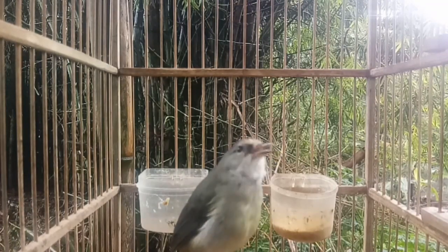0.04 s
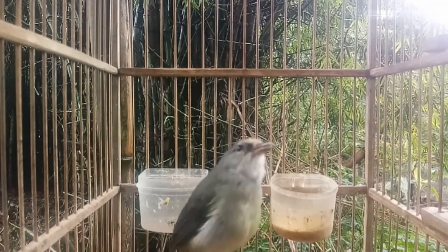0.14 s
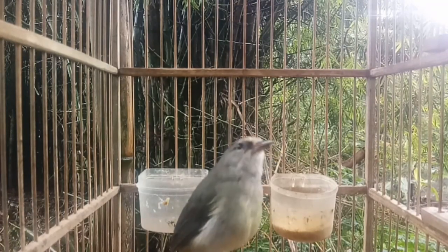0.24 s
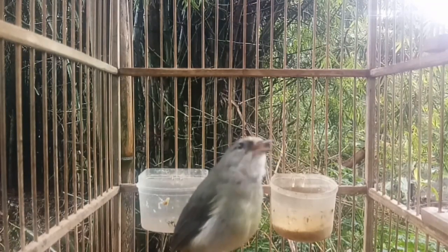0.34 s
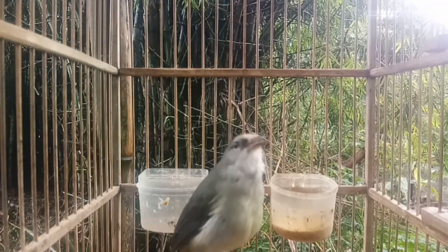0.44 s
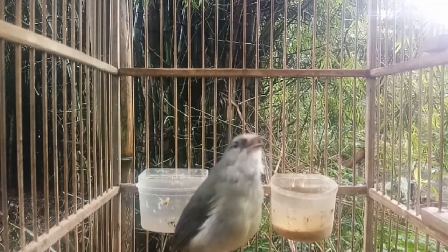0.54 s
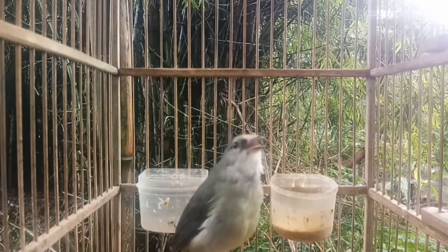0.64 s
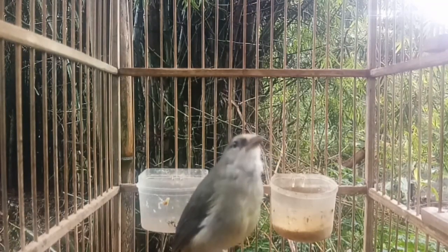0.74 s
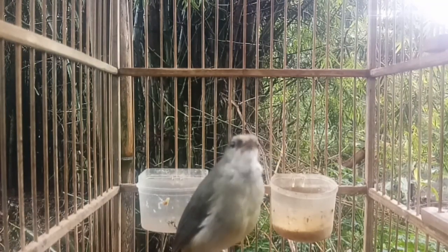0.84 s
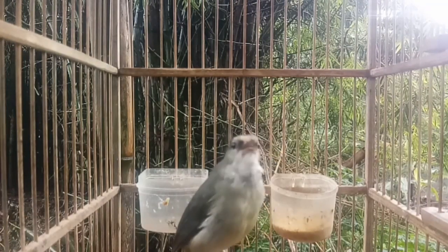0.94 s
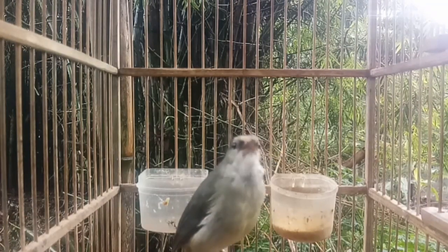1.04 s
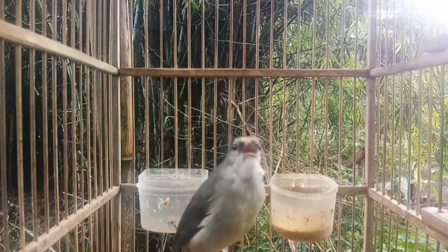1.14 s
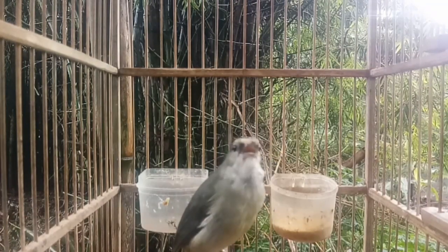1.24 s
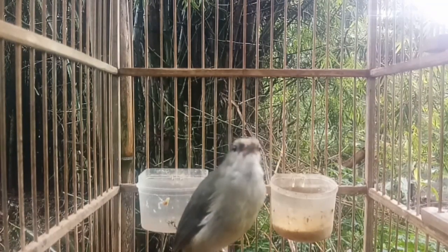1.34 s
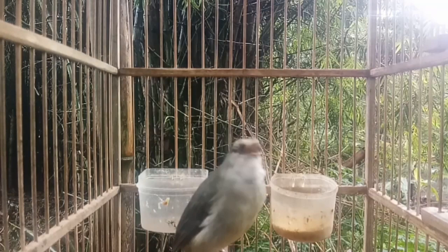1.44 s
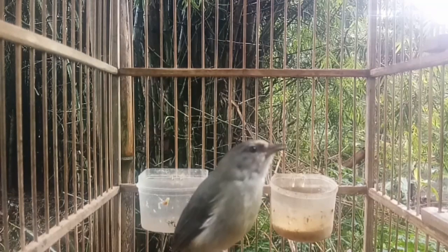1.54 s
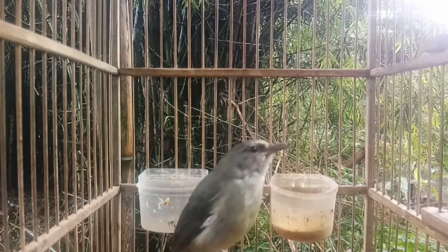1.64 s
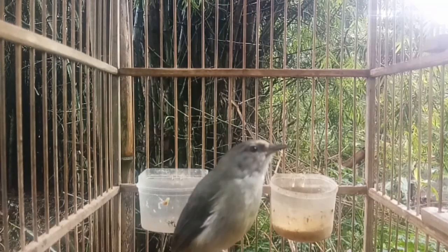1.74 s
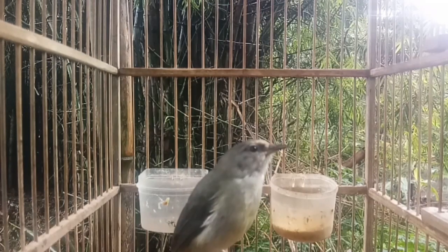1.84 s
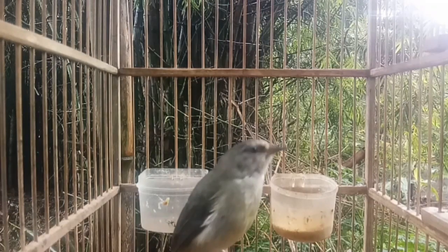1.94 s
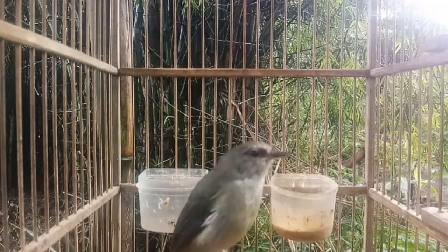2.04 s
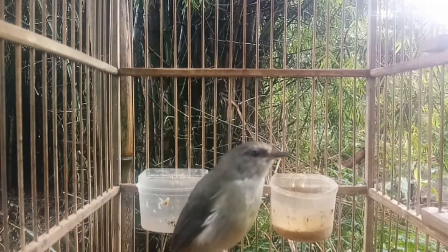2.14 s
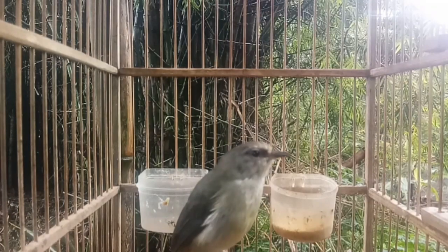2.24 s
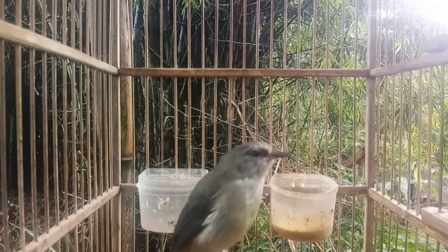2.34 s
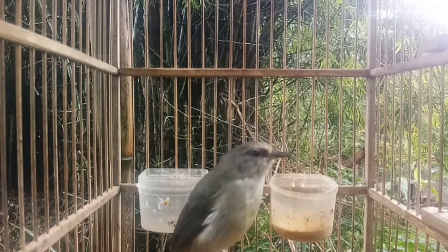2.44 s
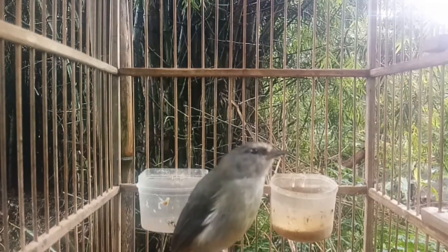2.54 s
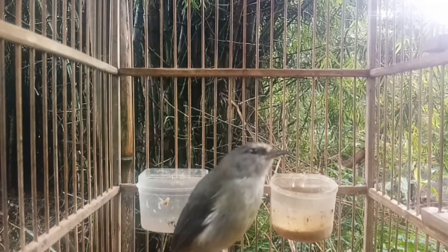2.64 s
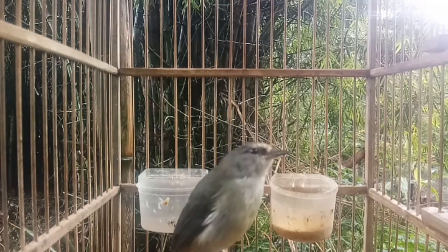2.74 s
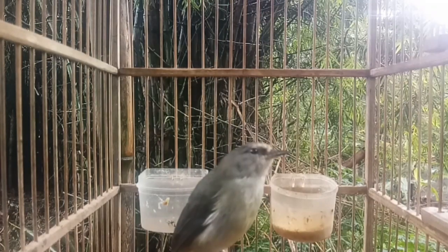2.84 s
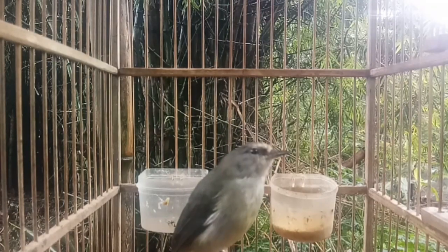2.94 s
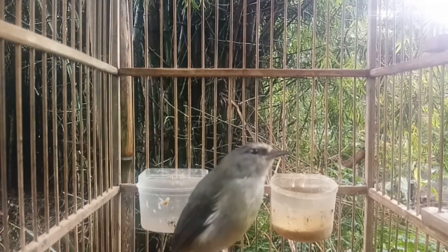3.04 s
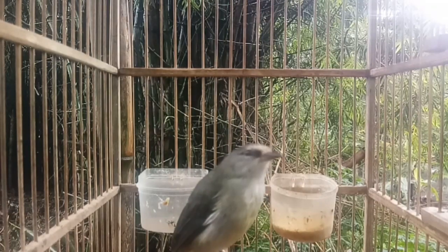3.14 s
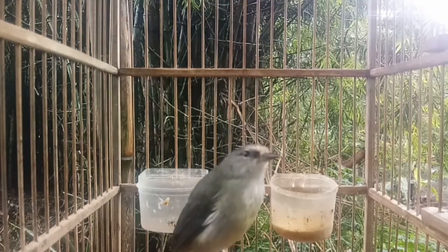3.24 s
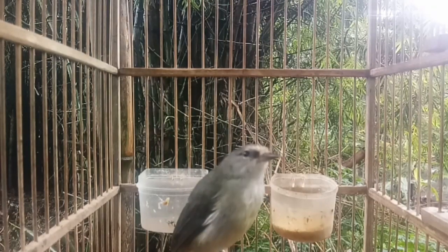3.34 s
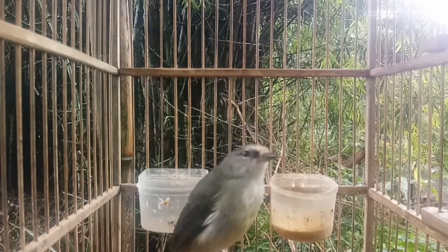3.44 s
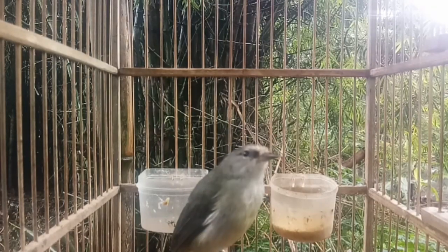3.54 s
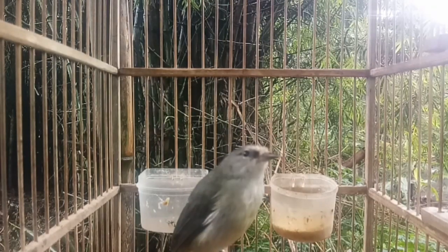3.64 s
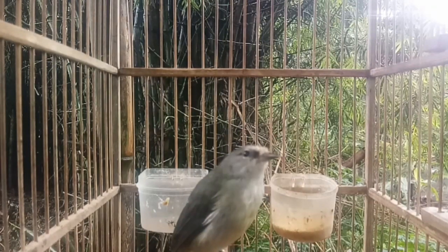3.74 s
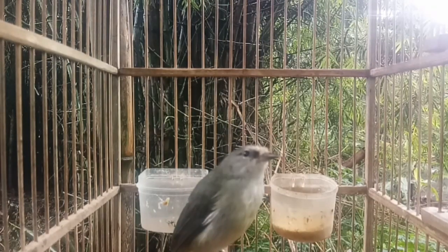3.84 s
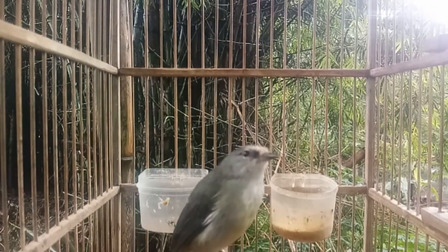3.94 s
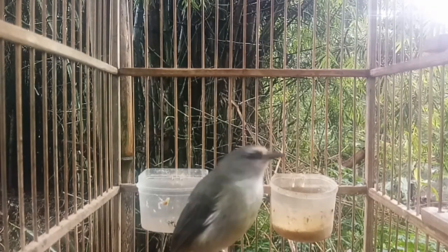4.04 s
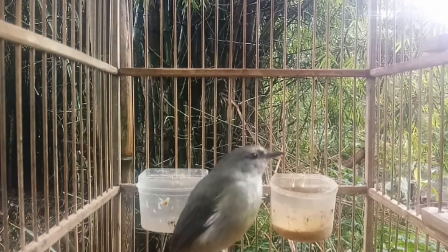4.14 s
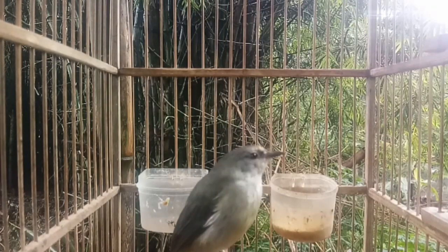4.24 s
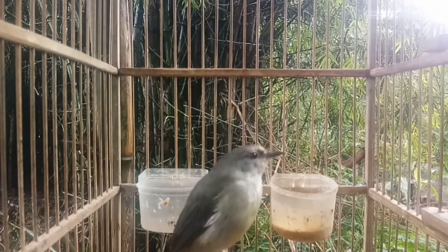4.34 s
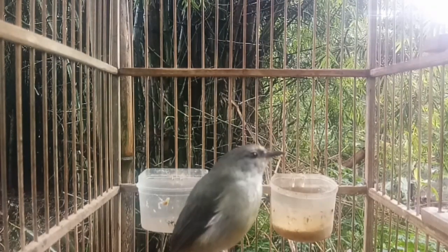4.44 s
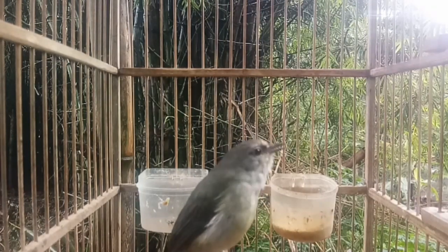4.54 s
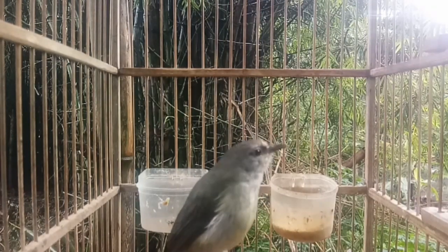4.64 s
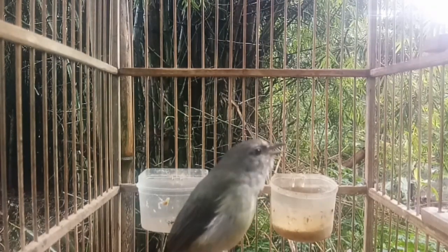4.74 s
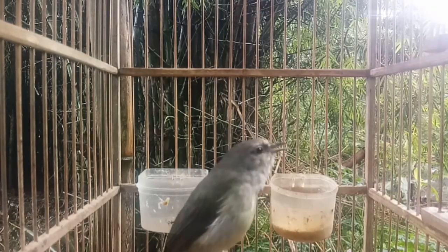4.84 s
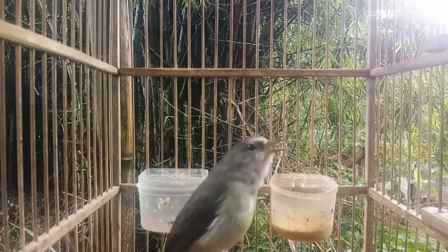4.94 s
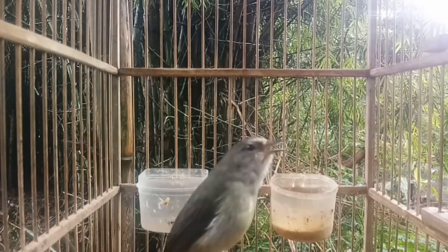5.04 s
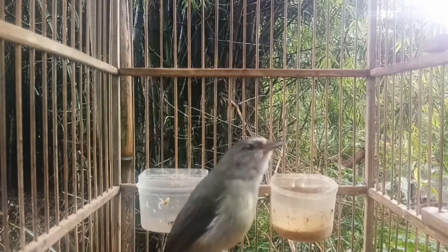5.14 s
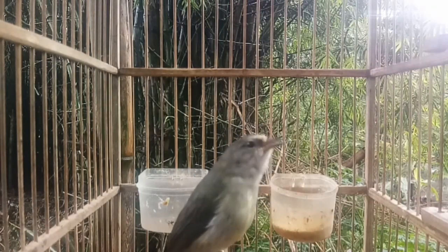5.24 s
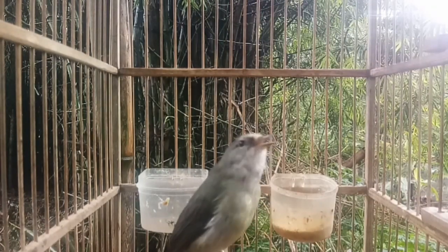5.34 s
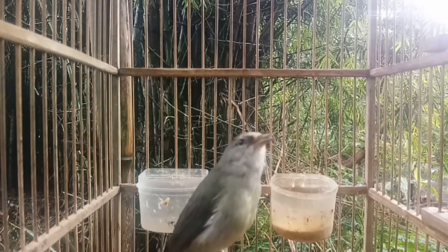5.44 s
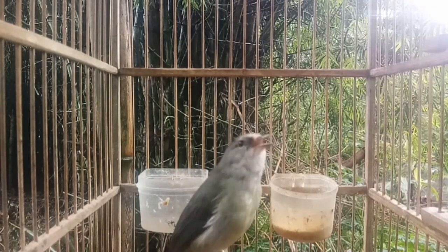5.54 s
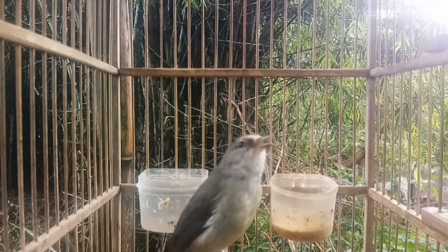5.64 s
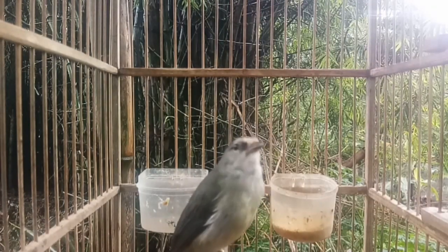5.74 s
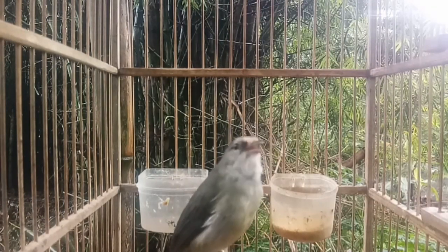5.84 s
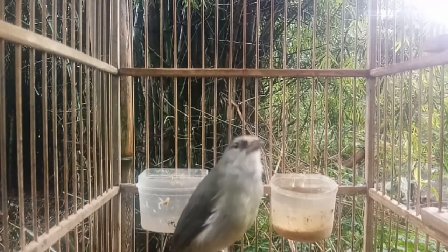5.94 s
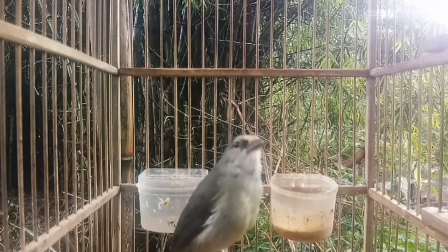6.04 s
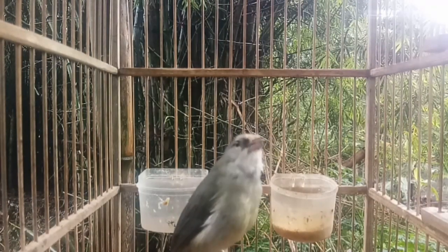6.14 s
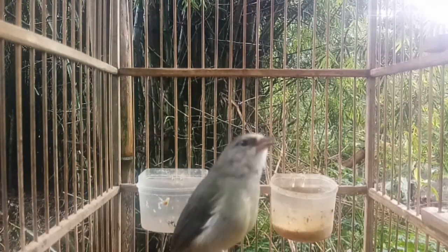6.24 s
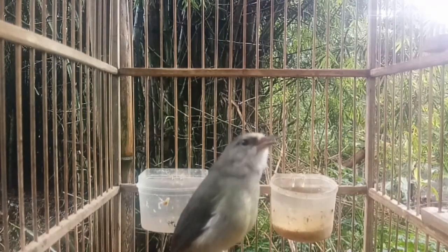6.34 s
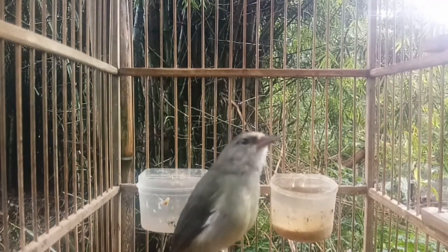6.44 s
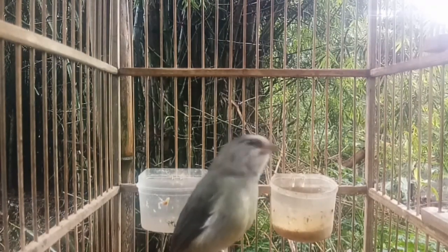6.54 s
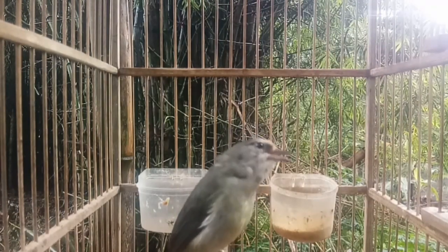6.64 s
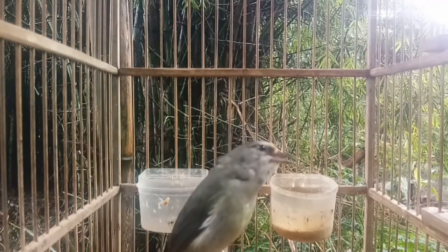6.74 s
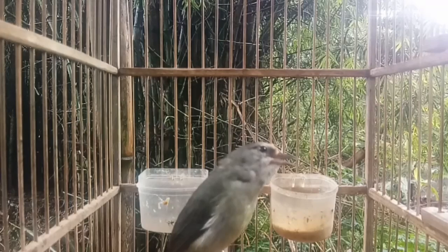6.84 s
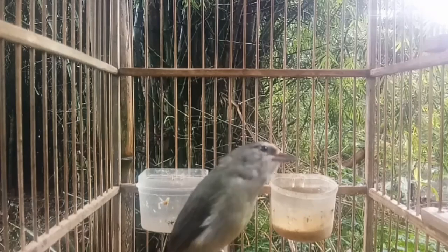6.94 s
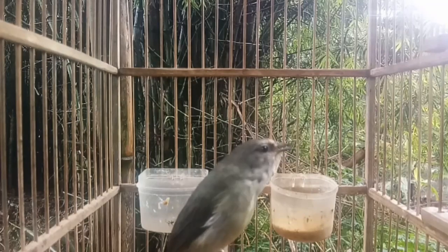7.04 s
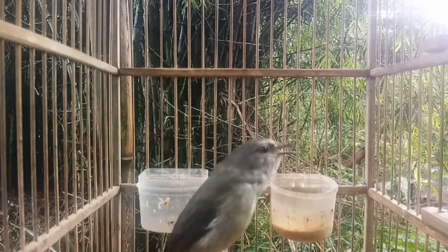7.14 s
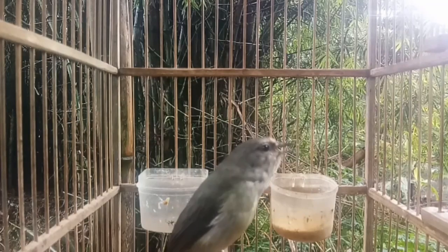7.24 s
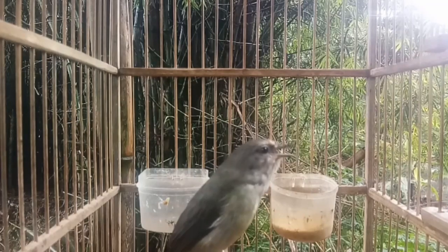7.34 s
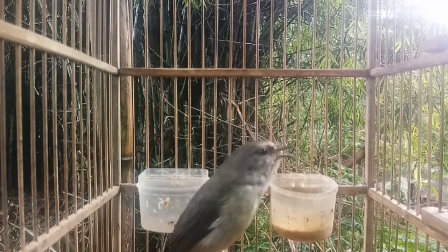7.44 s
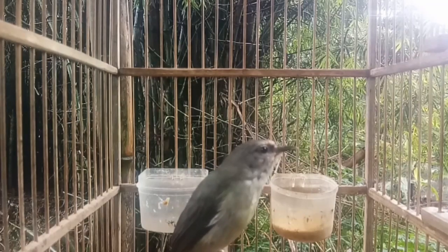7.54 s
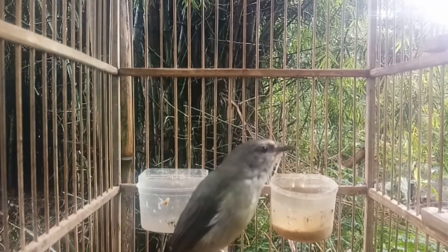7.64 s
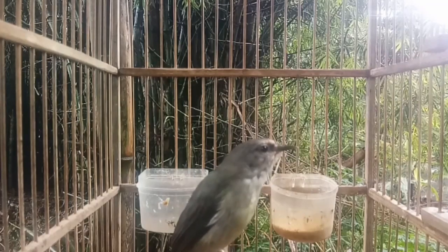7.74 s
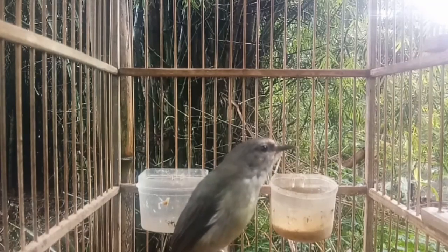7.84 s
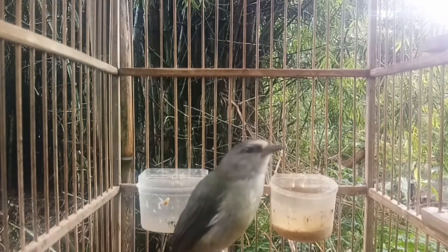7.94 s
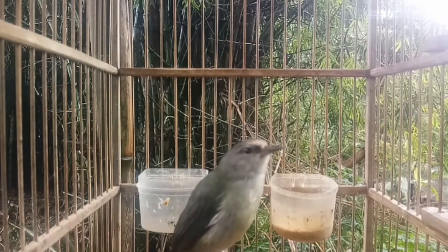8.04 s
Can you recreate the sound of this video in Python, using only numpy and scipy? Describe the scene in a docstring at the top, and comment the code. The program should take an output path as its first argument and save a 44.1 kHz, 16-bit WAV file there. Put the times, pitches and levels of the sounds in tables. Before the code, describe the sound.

Bright rapid bird whistles, jumping between low chirps and long piercing notes, pause mid-way over garden hiss, then resume and stop.

```python
"""A white-eye in a garden cage sings two bouts of quick slurred whistles, close to the microphone.
Each note is a gliding sine with faint overtones and fainter lines halfway between them.
A few far birds whistle more simply; a thin insect line, a steady outdoor hiss and a low rumble are shaped noise.
Echoes of the garden follow the birds, and the recorder's gain control pulls the hiss down under the loudest notes."""
import sys
import numpy as np
from scipy import signal
from scipy.fft import rfft, irfft, next_fast_len
from scipy.io import wavfile
from scipy.ndimage import uniform_filter1d

SR = 44100
rng = np.random.default_rng(int(sys.argv[2]) if len(sys.argv) > 2 else 0)


def output_pcm(signal):
    """Save a mono or channel-first signal as 16-bit PCM at the path in sys.argv[1].

    Samples are clipped to [-1, 1] before scaling.
    """
    pcm = np.clip(np.atleast_2d(signal).T, -1, 1) * 32767
    wavfile.write(sys.argv[1], SR, np.round(pcm).astype(np.int16))


N = 356748  # length of the scene in samples
TIME = np.arange(N) / SR


def gain_of(db):
    """Turns decibels into a factor for the wave."""
    return 10 ** (np.asarray(db) / 20)


def evened(x):
    """Scales a signal to an average strength (rms) of 1."""
    return x / np.sqrt(np.mean(x ** 2) + 1e-20)


def read(points, hz):
    """Reads a table of values by frequency, on a logarithmic frequency axis."""
    f, value = np.transpose(points)
    return np.interp(np.log(hz + 1), np.log(f + 1), value)


def band_noise(hz, width_hz):
    """Noise of rms 1 in a bell-shaped band; around 0 Hz it is a slow wander."""
    size = next_fast_len(N)
    bins_hz = np.fft.rfftfreq(size, 1 / SR)
    bell = np.exp(-.5 * ((bins_hz - hz) / width_hz) ** 2)
    return evened(irfft(rfft(rng.standard_normal(size)) * bell, size)[:N])


def slur(rows, fade_s):
    """Gives the sample places, gliding pitch and amplitude of one note with soft ends."""
    s, hz, db = np.transpose(rows)
    at = np.arange(max(int(s[0] * SR), 0), min(int(s[-1] * SR), N))
    t = at / SR
    to_nearest_end_s = np.minimum(t - s[0], s[-1] - t)
    ends = np.sin(np.pi / 2 * np.clip(to_nearest_end_s / fade_s, 0, 1))
    swell = np.interp(t, s, np.sqrt(gain_of(db))) ** 2
    pitch_hz = uniform_filter1d(np.interp(t, s, hz), size=130)
    # a sine needs a peak of sqrt(2) to have an rms of 1
    return at, pitch_hz, np.sqrt(2) * ends * uniform_filter1d(swell, size=60)


# The close bird's song, one list per note. Each row: time in seconds, pitch in Hz, level in dB.
SONG = [
    [(0.093, 2730, -28), (0.102, 2620, -19.5), (0.111, 2790, -15.5), (0.119, 2730, -15.5),
     (0.127, 2530, -27)],
    [(0.155, 2800, -29), (0.159, 2820, -18), (0.168, 2925, -12.5), (0.197, 2920, -11.5),
     (0.215, 3150, -8.5), (0.229, 3170, -11.5), (0.236, 3130, -11.5), (0.242, 3140, -29)],
    [(0.286, 2810, -36), (0.293, 2730, -13.5), (0.304, 2970, -9.5), (0.312, 2960, -8), (0.318, 3250, 0),
     (0.328, 3250, -11), (0.335, 3000, -6), (0.341, 2690, -19.5), (0.346, 2750, -36)],
    [(0.461, 2580, -29), (0.468, 2680, -19), (0.479, 3080, -9.5), (0.484, 3320, -16), (0.489, 3040, -15),
     (0.493, 3120, -4), (0.499, 3705, -3), (0.503, 3660, -5), (0.513, 3580, 0), (0.521, 3350, -6),
     (0.53, 3200, -25)],
    [(0.584, 2750, -48), (0.592, 2736, -16.5), (0.609, 3020, -7), (0.627, 3133, -10.5), (0.642, 3126, -7),
     (0.653, 3050, -6), (0.661, 3060, -9), (0.667, 3026, -8), (0.673, 3060, -9), (0.69, 2962, -7),
     (0.727, 2900, -6.5), (0.754, 2912, -8.5), (0.796, 2947, -7), (0.833, 2935, -8.5), (0.846, 2780, -32)],
    [(0.904, 2465, -35), (0.91, 2320, -17), (0.922, 2916, -13), (0.93, 3050, -13), (0.938, 2720, -11),
     (0.944, 2730, -28)],
    [(1.002, 2370, -34), (1.01, 2420, -13.5), (1.022, 2696, -10), (1.032, 2740, -5), (1.045, 2747, -5),
     (1.053, 2920, -9), (1.056, 2965, -2), (1.067, 3200, -6.5), (1.082, 3228, -10.5), (1.102, 3120, 0),
     (1.115, 2995, -6.5), (1.129, 2926, -4.5), (1.135, 2750, -17), (1.143, 2910, -20)],
    [(1.191, 3660, -38), (1.197, 3460, -7), (1.205, 3445, -15.5), (1.216, 3610, 7.5), (1.228, 3700, 0),
     (1.26, 3606, 4), (1.272, 3627, 4.5), (1.307, 3564, -1.5), (1.343, 3510, 3), (1.361, 3484, -1),
     (1.374, 3534, -4), (1.403, 3562, -3), (1.424, 3526, -7), (1.434, 3536, -5), (1.443, 3560, -27)],
    [(1.579, 2550, -33), (1.585, 3225, -21), (1.592, 3210, -16), (1.608, 3560, 1), (1.614, 3573, -1),
     (1.643, 3500, -0.5), (1.648, 3430, -11), (1.663, 3374, -6), (1.674, 3280, -17), (1.681, 3360, -33)],
    [(4.676, 2880, -28), (4.689, 3160, -17.5), (4.697, 3050, -15.5), (4.702, 3240, -11), (4.708, 3164, -14),
     (4.717, 2960, -21), (4.73, 2860, -21.5), (4.735, 2850, -31)],
    [(4.865, 2660, -28), (4.886, 3190, -16), (4.894, 3040, -13.5), (4.9, 3590, -1), (4.907, 3745, -4),
     (4.929, 3355, -9), (4.936, 3300, -32)],
    [(4.995, 2440, -34), (4.999, 2930, -24), (5.004, 2880, -16.5), (5.032, 3070, -12), (5.06, 3105, -9),
     (5.09, 3032, -6.5), (5.095, 3017, -11), (5.127, 2923, -10.5), (5.138, 2920, -9), (5.144, 2883, -11.5),
     (5.199, 2860, -12), (5.227, 2878, -12.5), (5.245, 2806, -16.5), (5.25, 2850, -41)],
    [(5.31, 2360, -23), (5.316, 2410, -16.5), (5.325, 2770, -7), (5.332, 2980, -11.5), (5.335, 2970, -13),
     (5.343, 2750, -9.5), (5.35, 2700, -23)],
    [(5.403, 2340, -22), (5.427, 2710, -3), (5.447, 2783, -7), (5.457, 2970, -8), (5.468, 3183, -7),
     (5.496, 3217, -3.5), (5.517, 3060, -6.5), (5.532, 2750, -13.5), (5.538, 2630, -25)],
    [(5.592, 3290, -29), (5.596, 3280, -15.5), (5.608, 3340, -16), (5.619, 3545, 4), (5.631, 3642, 8),
     (5.638, 3620, 5.5), (5.666, 3597, -2.5), (5.691, 3584, 0), (5.698, 3580, -3), (5.732, 3572, -2),
     (5.744, 3570, -4.5), (5.772, 3596, -6.5), (5.789, 3540, -6.5), (5.794, 3550, -9.5), (5.799, 3600, -35)],
    [(5.909, 2630, -33), (5.915, 3120, -21), (5.93, 3320, -14.5), (5.938, 3486, 2), (5.948, 3556, -1.5),
     (5.967, 3514, -1), (5.972, 3530, -3), (5.994, 3350, -6), (6.005, 3340, -16), (6.013, 3400, -22)],
    [(6.098, 2700, -36), (6.103, 2660, -18), (6.123, 3123, -6.5), (6.132, 3130, -4), (6.153, 3030, -4.5),
     (6.167, 2900, -16), (6.174, 2900, -20)],
    [(6.233, 2380, -36), (6.24, 2310, -17), (6.257, 2720, -9.5), (6.265, 2750, -7.5), (6.279, 2330, -26)],
    [(6.3, 2780, -42), (6.304, 2720, -12.5), (6.316, 2925, -10), (6.343, 2905, -9.5), (6.351, 3060, -10),
     (6.358, 3130, -3), (6.364, 3180, -4), (6.371, 3080, -7.5), (6.382, 2800, -23)],
    [(6.44, 2620, -31), (6.445, 2640, -15.5), (6.457, 2944, -10), (6.466, 2890, -3), (6.471, 3420, -6),
     (6.474, 3427, 0), (6.483, 3360, -3.5), (6.493, 3000, -11), (6.498, 2710, -12.5), (6.503, 2690, -23)],
    [(6.62, 2670, -35), (6.624, 2630, -21), (6.64, 3140, -7.5), (6.643, 3020, -16), (6.649, 3040, -10),
     (6.655, 3620, 0.5), (6.662, 3680, 0), (6.671, 3580, -0.5), (6.684, 3160, -16), (6.689, 3220, -21)],
    [(6.745, 2680, -37), (6.751, 2680, -17.5), (6.771, 3014, -8.5), (6.789, 3023, -9), (6.793, 3053, -6.5),
     (6.847, 2930, -11.5), (6.865, 2938, -6), (6.893, 2860, -9.5), (6.902, 2845, -9), (6.925, 2888, -10.5),
     (7.035, 2925, -12), (7.045, 2850, -31)],
    [(7.106, 2290, -29), (7.112, 2320, -12.5), (7.123, 2786, -9.5), (7.128, 2890, -13), (7.135, 2670, -7.5),
     (7.143, 2520, -35)],
    [(7.206, 2280, -24), (7.213, 2280, -15), (7.224, 2500, -8), (7.233, 2595, -6), (7.247, 2654, -4),
     (7.272, 3040, -10), (7.278, 3154, -3), (7.288, 3200, -6.5), (7.307, 3133, -3), (7.32, 2980, -8.5),
     (7.345, 2940, -11.5), (7.354, 2780, -16), (7.361, 2780, -22)],
    [(7.406, 3540, -43), (7.416, 3305, -7), (7.427, 3410, -14), (7.44, 3576, 5), (7.446, 3624, 2),
     (7.458, 3610, 4.5), (7.471, 3550, -2.5), (7.523, 3540, -3.5), (7.563, 3519, -2.5), (7.607, 3596, -5),
     (7.615, 3605, -9), (7.625, 3624, -12), (7.631, 3540, -27)],
]
# How rich each note is. Each row: extra strength of the overtones in dB,
# extra strength of the lines halfway between them in dB.
VOICE = [(-10, 1), (-1, -10), (-2, -10.5), (-1.5, -12), (-2, -11), (6.5, -3), (-1, -6.5), (-5.5, -7),
         (-1, -14), (0, 0), (0, -1), (-1, -6), (-0.5, -3), (0.5, -14), (-5.5, -9), (-10, -13),
         (-5.5, -12.5), (1.5, -15), (1.5, -12.5), (0.5, -16), (2, -17), (0.5, -11), (-3, 0.5), (0.5, -5.5),
         (-2, -11)]
# Colour that throat and beak give the overtones. Each row: frequency in Hz, level in dB against the whistle.
OVERTONES = [(4600, -30.5), (5500, -32.5), (6200, -25), (7200, -41), (8000, -43), (8700, -37),
             (10800, -35.5), (11700, -35), (12800, -34), (14100, -34.5), (14700, -18.5), (15500, -20)]
# Colour of the halfway lines. Each row: frequency in Hz, level in dB against the whistle.
HALF_LINES = [(1250, -45), (1520, -27), (1800, -31), (3700, -33.5), (4350, -17.5), (4800, -21), (5300, -27),
              (7300, -42.5), (9000, -45), (10300, -38.5), (12400, -47.5), (13200, -30), (15500, -34.5)]


def white_eye(jitter=0.0014, shimmer_db=0.63, rasp_db=-42, settle=.35):
    """A nearly pure whistle; alternate cycles differ a little, which puts faint lines between its overtones."""
    out = np.zeros(N)
    # small random changes of pitch, loudness and roughness
    waver, shimmer, rasp = band_noise(0, 160), band_noise(0, 120), band_noise(0, 700)
    flicker_db = 3.2 * band_noise(0, 14) + 2.4 * band_noise(0, 70) - 1.7
    multiples = np.arange(1, 13) / 2  # half steps of the pitch: 0.5 to 6
    shifts = rng.integers(0, N, len(multiples))
    for rows, (overtones_db, halves_db) in zip(SONG, VOICE):
        at, hz, size = slur(rows, fade_s=0.00077)
        phase = 2 * np.pi * np.cumsum(hz * (1 + jitter * waver[at])) / SR
        note = np.sin(phase) * (1 + gain_of(rasp_db) * rasp[at])
        # the harder the bird blows, the more alike its cycles are
        loudness_db = 20 * np.log10(np.maximum(size, .3) / .5)
        uneven_db = halves_db - settle * loudness_db
        for k, shift in zip(multiples, shifts):
            if k == 1:
                continue  # the whistle itself is already there
            if k % 1:
                line_db = uneven_db + read(HALF_LINES, k * hz)
            else:
                line_db = overtones_db + read(OVERTONES, k * hz)
            # each line swells and fades on its own as the beak moves
            strength = gain_of(line_db + flicker_db[(at + shift) % N])
            fits = k * hz < SR / 2  # leave out what digital sound cannot hold
            note += strength * np.sin(k * phase) * fits
        out[at] += size * gain_of(shimmer_db * shimmer[at]) * note
    return out


# Calls of the far birds, one list per call. Each row: time in seconds, pitch in Hz,
# level in dB before scene() lifts it.
FAR_CALLS = [
    [(3.15, 3780, -58), (3.24, 3830, -56)],
    [(3.32, 3800, -55), (3.38, 3850, -55)],
    [(3.46, 4000, -59), (3.53, 4150, -52), (3.6, 4200, -55), (3.67, 4180, -63)],
    [(4.06, 6350, -57), (4.11, 6200, -50), (4.16, 6100, -58)],
    [(4.26, 3900, -58), (4.32, 4200, -53), (4.38, 4130, -60)],
    [(4.41, 3800, -61), (4.5, 3700, -55), (4.57, 3650, -62)],
    [(4.708, 1193, -42), (4.735, 1235, -36), (4.757, 1075, -39.5), (4.78, 1175, -41), (4.812, 1240, -38),
     (4.838, 1144, -34.5), (4.86, 1287, -38), (4.882, 1340, -34)],
    [(4.876, 1520, -44), (4.897, 1580, -45)],
    [(4.897, 1900, -43), (4.925, 1790, -50)],
    [(4.924, 2010, -43), (4.947, 2100, -44)],
    [(4.905, 2400, -46), (4.95, 2520, -49), (4.99, 2850, -48)],
]


def far_birds(jitter=0.0094, octave_db=-15):
    """Faint wavering whistles from further off, each a sine with a weaker one an octave above."""
    out, waver = np.zeros(N), band_noise(0, 90)
    for rows in FAR_CALLS:
        at, hz, size = slur(rows, fade_s=0.0048)
        phase = 2 * np.pi * np.cumsum(hz * (1 + jitter * waver[at])) / SR
        out[at] += size * (np.sin(phase) + gain_of(octave_db) * np.sin(2 * phase))
    return out


# How long the garden rings. Each row: frequency in Hz, time to die away by 60 dB in seconds.
GARDEN = [(1000, 1), (3300, 0.5), (8000, .3), (15000, 0.2)]


def garden(x):
    """Quick reflections from the cage and things around it, then a faint longer ring that loses treble first."""
    near_db, near_t60, far_db = -22.5, .11, -34  # near_t60: seconds to die away by 60 dB
    t = np.arange(SR // 2) / SR
    # sparse random clicks, about 2000 a second, stand for single reflections
    signs = rng.choice([-1., 1.], (2, len(t)))
    near, far = signs * (rng.random((2, len(t))) < 2000 / SR)
    near = near * (t > .005) * gain_of(-60 * t / near_t60)
    hz, frame_s, z = signal.stft(far * (t > .02), SR, nperseg=256)
    decay = gain_of(-60 * frame_s / read(GARDEN, hz)[:, None])
    far = signal.istft(z * decay, SR, nperseg=256)[1][:len(t)]
    echoes = gain_of(near_db) * near / np.linalg.norm(near) + gain_of(far_db) * far / np.linalg.norm(far)
    return signal.fftconvolve(x, echoes)[:N]


def insects():
    """A thin steady shrill from the bushes: two narrow bands of noise."""
    return gain_of(-56.5) * band_noise(7285, 70) + gain_of(-62) * band_noise(7595, 15)


# Colour of the outdoor hiss. Each row: frequency in Hz, relative strength in dB for an equal slice of Hz.
HISS = [(25, -22.5), (55, -15), (90, -5), (300, 0), (800, 1), (1500, -2.5), (2600, -7), (6700, -8.5),
        (7900, -16), (10000, -13.5), (12000, -22.5), (13700, -23.5), (14600, -13), (15500, -12.5)]


def hiss(level_db=-38.5, patchy_db=1.47):
    """Wide outdoor noise with slightly drifting patches, built from short overlapping spectra."""
    frames, hz = N // 256 + 5, np.fft.rfftfreq(1024, 1 / SR)
    real, imaginary, patches = rng.standard_normal((3, frames, len(hz))).transpose(0, 2, 1)
    # smooth the patches over time, then over frequency
    patches = uniform_filter1d(patches, size=8, axis=1)
    patches = evened(uniform_filter1d(patches, size=7, axis=0))
    colour_db = read(HISS, hz)[:, None]
    z = (real + 1j * imaginary) * gain_of(colour_db + patchy_db * patches)
    noise = signal.istft(z, nperseg=1024, noverlap=768)[1][:N]
    return gain_of(level_db) * evened(noise)


# Low rumble of moving air. Each row: time in seconds, level in dB before the random puffs.
RUMBLE = [(0, -74), (1.9, -72), (2.2, -62), (4.4, -60), (4.55, -50), (4.7, -65), (6.5, -59.5), (7.6, -56.5),
          (7.85, -53), (8, -45.5), (8.09, -46)]


def rumble(gust_db=4):
    """Soft uneven puffs of air at the microphone: low noise whose level wanders."""
    level_db = np.interp(TIME, *np.transpose(RUMBLE))
    return gain_of(level_db + gust_db * band_noise(0, 9)) * band_noise(92, 30)


def overload(x, headroom=3.07, lopsided=0.0063):
    """The loudest notes round off in the microphone: an edge of third overtone and a soft low bump."""
    rounded = headroom * np.tanh(x / headroom)
    low_cut = signal.butter(2, 28, "highpass", fs=SR, output="sos")
    return signal.sosfilt(low_cut, rounded + lopsided * rounded ** 2)


def scene():
    """Adds up the birds, their echoes and the background."""
    near, far = white_eye(), far_birds()
    # far birds carry much more echo than the close one
    birds = near + gain_of(2.5) * far
    echoes = garden(near + gain_of(10) * far)
    return (birds + echoes + hiss() + insects() + rumble())[None]


def record(dry, threshold_db=-8.5, squeeze=0.66, recovery_db_per_s=130):
    """Gain control ducks fast on loud notes, holds them near a ceiling and recovers; then the treble is cut off."""
    ceiling_db, edge_hz = -5.7, 15700
    heard = overload(dry)
    power_db = 10 * np.log10(abs(uniform_filter1d(heard[0] ** 2, size=130)) + 1e-12)
    squeezed_db = squeeze * np.maximum(power_db - threshold_db, 0)
    over_db = np.maximum(squeezed_db, power_db - ceiling_db)
    # a running maximum against a steady slope: quick to duck, slower to recover
    fall = TIME * recovery_db_per_s
    duck_db = np.maximum.accumulate(over_db + fall) - fall
    ducked = heard / gain_of(uniform_filter1d(duck_db, size=50))
    treble_cut = signal.firwin(511, edge_hz, window=("kaiser", 9), fs=SR)
    return signal.oaconvolve(ducked, treble_cut[None], "same")


dry = scene()
out = record(dry)
output_pcm(out)
```